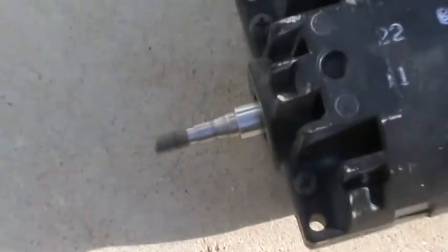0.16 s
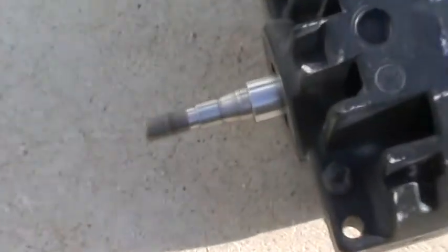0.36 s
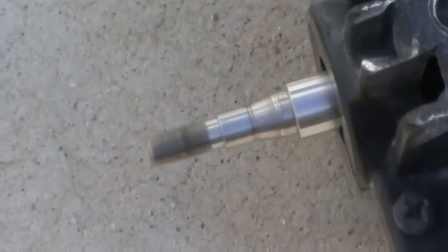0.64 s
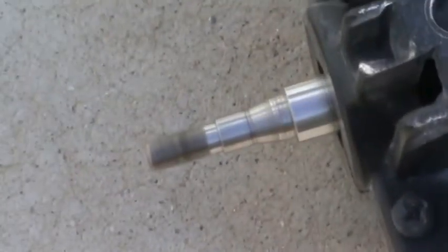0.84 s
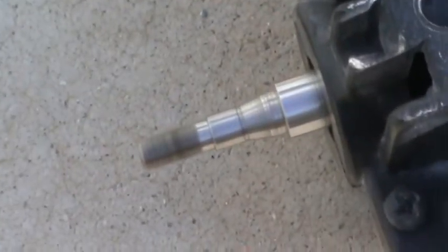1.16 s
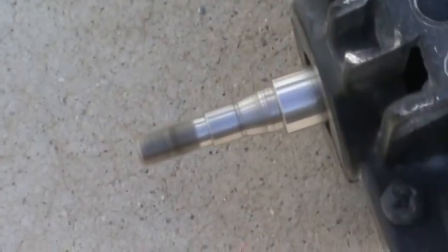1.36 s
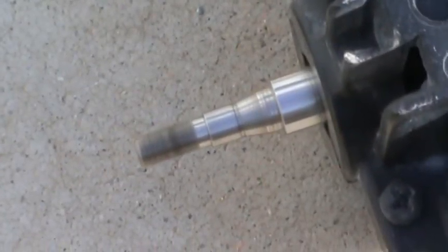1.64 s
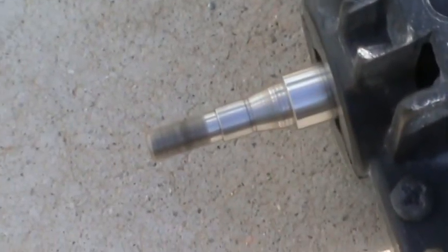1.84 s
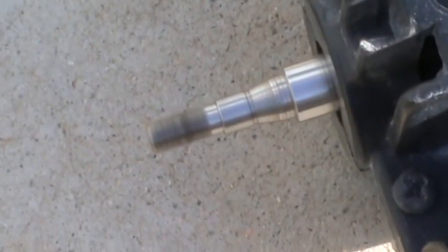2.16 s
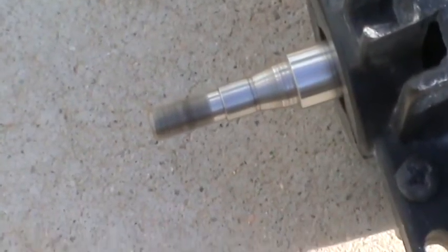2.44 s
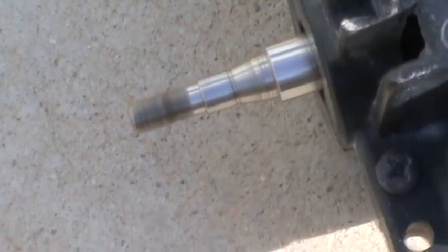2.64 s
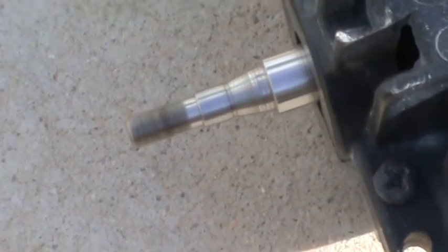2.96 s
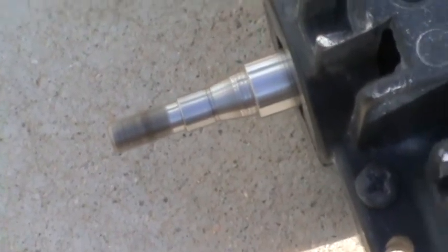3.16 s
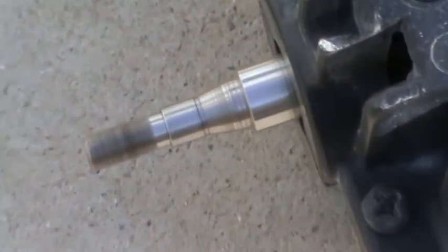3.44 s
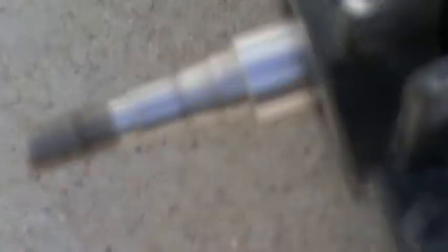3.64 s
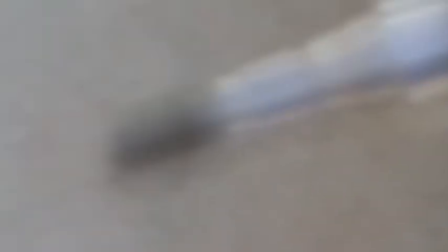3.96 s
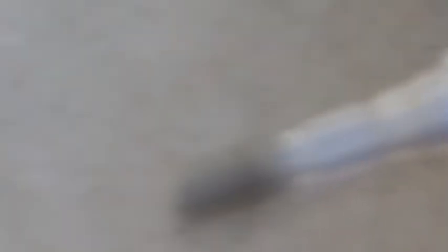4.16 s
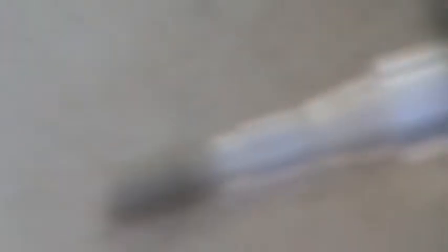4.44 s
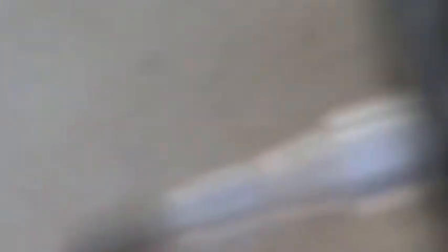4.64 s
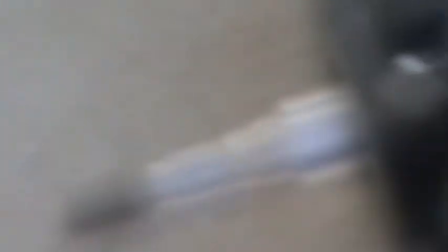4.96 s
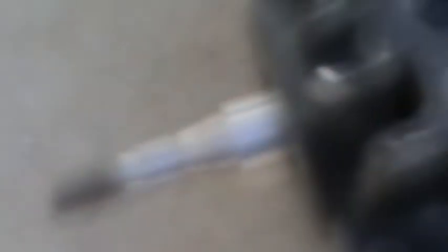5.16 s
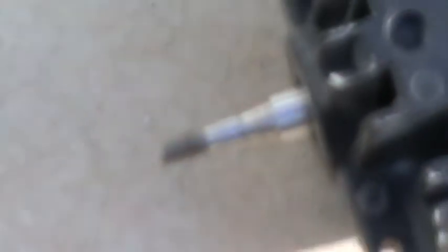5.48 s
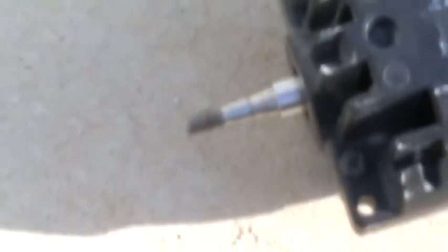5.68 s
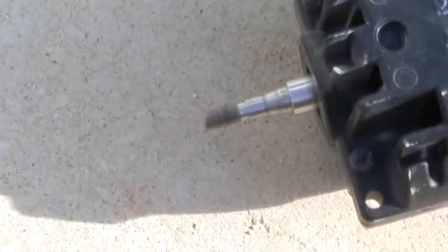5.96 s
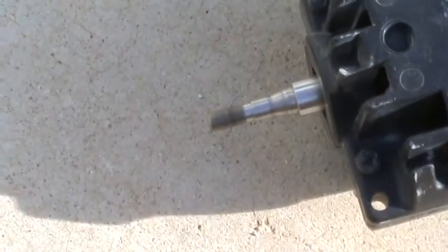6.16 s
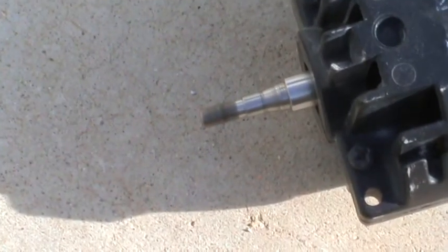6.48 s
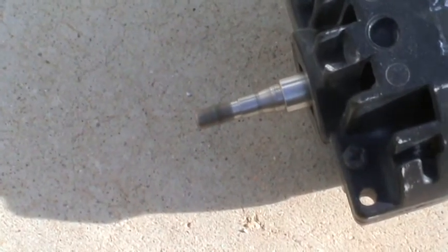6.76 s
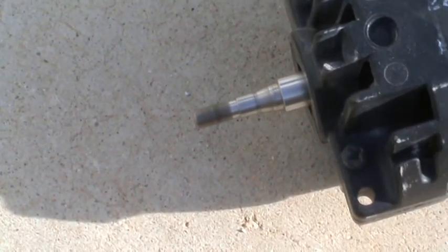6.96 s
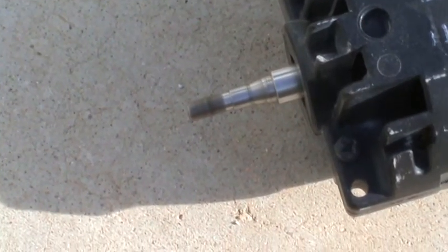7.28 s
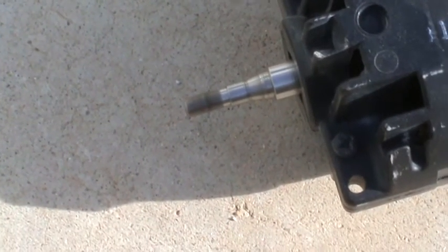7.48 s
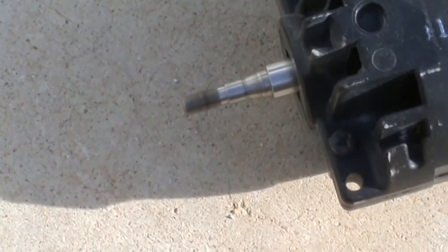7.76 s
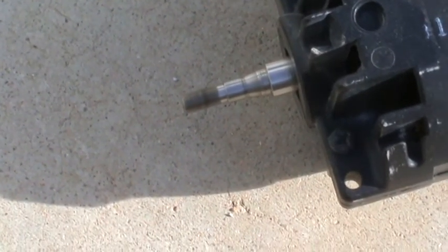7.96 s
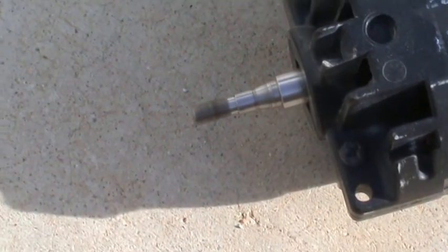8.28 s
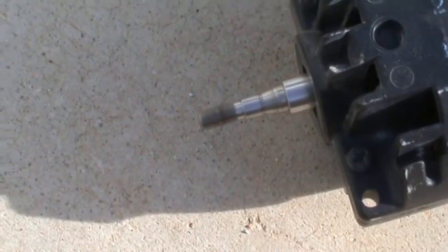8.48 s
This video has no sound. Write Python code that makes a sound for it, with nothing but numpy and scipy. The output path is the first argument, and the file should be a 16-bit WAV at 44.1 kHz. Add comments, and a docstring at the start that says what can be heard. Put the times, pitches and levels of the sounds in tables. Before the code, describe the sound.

A bare electric motor whines piercingly over a loud rush of air, climbing in pitch, holding, dropping back, then spinning down.

```python
"""A piercing electric whine over a rush of air climbs in pitch, holds, drops back and sinks away.
A bare brush motor runs on concrete outdoors, close to a hand-held camera: half-wave mains at first,
full power from about 1 s, half-wave again at 6.6 s, cut off at 7.5 s to coast. Commutator bars and rotor
slots sound as sines locked to the shaft angle, the rush as noise coloured by the housing; rotor tones,
a thin high hiss, low rumble, a sinking hum and soft bumps of the hand lie beneath."""
import sys
import numpy as np
from scipy import signal
from scipy.fft import rfft, irfft
from scipy.io import wavfile
from scipy.ndimage import uniform_filter1d, map_coordinates

SR = 44100
rng = np.random.default_rng(int(sys.argv[2]) if len(sys.argv) > 2 else 0)


def to_wav(s):
    """Save 16-bit WAV."""
    ch = np.atleast_2d(s).T  # columns
    pcm = np.round(np.clip(ch, -1, 1) * 32767)  # PCM
    wavfile.write(sys.argv[1], SR, pcm.astype(np.int16))


N = 380125

T = np.arange(N) / SR  # time [s]
HZ = np.fft.rfftfreq(N, 1 / SR)  # frequency of each spectrum bin [Hz]
MAINS_HZ = 60
BARS, SLOTS = 22, 24  # commutator bars and rotor slots, passing once each per turn
SWITCH_BLUR = 6000  # smoothing of the switch state [samples]

# the power switch; a negative aim stands for friction braking the shaft:
# (time [s], share of mains half-waves let through [0-1], speed aimed at before the wander [turns/s], lag [s])
SWITCH = [(0, .5, 269.2, .55), (1.031, 1, 319.86, .359), (6.564, .5, 270.4, .596), (7.531, 0, -73.6, 2.778)]


def amp(db):
    """Decibels to gain."""
    return 10 ** (np.asarray(db) / 20)


def curve(rows):
    """Each value column of a timed table, joined by straight lines at every sample."""
    times, *columns = np.transpose(rows)
    return [np.interp(T, times, column) for column in columns]


def read(points, hz):
    """A spectrum, joined by straight lines over log frequency."""
    point_hz, value = np.transpose(points)
    return np.interp(np.log(hz + 1), np.log(point_hz + 1), value)


def evened(x):
    """Scaled to rms 1."""
    return x / np.sqrt(np.mean(x ** 2) + 1e-20)


def drift(hz):
    """Smooth random motion of rms 1, up to about hz, refreshed every 50 samples."""
    knots = rng.standard_normal(4000)
    knot_positions = 2 * hz * T[::50]
    path = map_coordinates(knots, [knot_positions], order=3, mode="mirror")
    return evened(path.repeat(50)[:N])


def port(column):
    """One column of the table of the two microphone ports, at every frequency."""
    # (frequency [Hz], likeness of the ports [0-1], lead of the left [rad], left minus right [dB])
    port_table = [(45, 0.95, -0.08, 0.1), (130, 0.81, -0.52, -0.4), (250, 0.94, -1.17, -0.1),
                  (450, 0.92, -1.53, -0.6), (950, 0.98, -1.62, -1.0), (1600, 0.96, -1.44, -2.7),
                  (2500, 0.84, -1.09, -2.5), (3500, 0.92, -0.8, -3.4), (5000, 0.81, -0.42, -1.8),
                  (8000, 0.89, -0.12, -0.8), (9700, 0.87, -0.23, -0.5), (12000, 0.77, -3.01, 0.5),
                  (15000, 0.85, -0.01, 0.3)]
    return read(np.array(port_table)[:, [0, column]], HZ)


def ports(spectrum):
    """One sound at the two ports, with their differences in phase and level."""
    left = amp(port(3) / 2) * np.exp(.5j * port(2))
    return irfft(spectrum * np.array([left, 1 / left]), N)


def power():
    """The switch as three on/off tracks: half power, full power, off."""
    times, shares, _, _ = np.transpose(SWITCH)
    now = shares[np.searchsorted(times, T, side="right") - 1]
    return np.array([now == .5, now == 1, now == 0], float)


def shaft_speed():
    """Turns per second: the rotor's inertia makes it ease towards each new speed after the switch moves."""
    # a little irregularity, the last value held: (time [s], extra speed [turns/s])
    wander = [(0, -.35), (.85, .3), (1.2, 0), (1.97, 0), (3.5, 8.5), (4.35, 3.8), (4.7, 3.8), (5.25, 7.75),
              (5.55, 8), (6.15, 4.5), (6.56, 3.75)]
    speed = np.full(N, SWITCH[0][2])
    for start, _, aim, lag in SWITCH:
        after = T >= start
        speed[after] = aim + (speed[after][0] - aim) * np.exp(-(T[after] - start) / lag)
    return speed + curve(wander)[0]


def shaft(speed, half_wave_rad=0.18, full_wave_rad=.02, jitter_rad=.06):
    """Shaft angle [rad]: pulses of mains current nudge the rotor, once a cycle on half-wave, twice on full."""
    half, full, _ = power()
    mains = 2 * np.pi * MAINS_HZ * T
    nudge = half_wave_rad * half * np.sin(mains) + full_wave_rad * full * np.sin(2 * mains)
    # the depths are radians of the commutator whine, so divide by the bars
    return 2 * np.pi * np.cumsum(speed) / SR + (nudge + jitter_rad * drift(38)) / BARS


def whine(speed, angle, trim_db=0.0, slot_db=-3.5, slot_coast_db=3,
          flutter_db=0.74, sway_db=.5, slot_sway_db=2.0, lead_rad=-.55):
    """Passing bars give a piercing line, rotor slots a softer one above; the body favours some pitches."""
    # how strongly the body radiates, before trims: (pitch [Hz], commutator [dB], rotor slots [dB])
    radiation = [(3720, -37, -40), (3960, -29.5, -39), (4250, -34, -41), (4600, -42, -48), (5000, -40, -40),
                 (5580, -28, -36), (6085, -18, -33), (6460, -18, -32.5), (6960, -20, -36),
                 (7740, -21.5, -32), (7770, -20, -39)]
    # the camera moves through the beams of the whine: (time [s], level [dB], left minus right [dB])
    beam = [(0, 2.5, -2.5), (.9, 1.5, -2.5), (1.2, -0.5, -2.6), (1.65, -0.5, -2.4), (1.78, -1, -3),
            (2.1, 2.5, -.6), (2.42, -0.5, -.4), (2.62, -2, -5), (3.05, -1.5, -2.2), (3.25, -3.5, -4.8),
            (3.6, -3, -6), (3.8, -7.5, -6), (3.9, -0.9, -1.5), (4.4, -0.3, -3), (5.25, 0.5, -.6),
            (5.5, 0, 1.6), (6, 0.2, -1.9), (7.5, 0.2, -2)]
    hz, bars_db, slots_db = np.transpose(radiation)
    beam_db, pan_db = curve(beam)
    side = np.array([[.5], [-.5]])  # left, right
    bars = amp(np.interp(BARS * speed, hz, bars_db) + trim_db + sway_db * drift(5))

    # the slot line gains once the current is off
    coast_db = slot_coast_db * uniform_filter1d(power()[2], size=SWITCH_BLUR)
    slots = amp(np.interp(SLOTS * speed, hz, slots_db) + slot_db + coast_db + slot_sway_db * drift(5))

    bar_line = bars * np.sin(BARS * angle + side * lead_rad)
    slot_line = slots * np.sin(SLOTS * angle + side * lead_rad)
    # both waver a little together in the moving air
    level = amp(beam_db + side * pan_db + flutter_db * drift(28))
    return np.sqrt(2) * level * (bar_line + slot_line)


def housing():
    """Gain per root Hz of the air path out of the motor, of unit power from 700 to 3400 Hz."""
    # broad colour of the rush, before scaling: (frequency [Hz], level [dB per Hz])
    air_colour = [(30, -24.5), (130, -30), (430, -21.5), (750, -11), (1500, -3), (2600, -2.5), (3600, -0.5),
                  (5000, -3.5), (6500, -1.5), (9400, -6), (10800, -15.5), (12500, -16.5), (14300, -25.5),
                  (15600, -17)]
    # peaks in the colour of the rush; the narrow one near 535 Hz stands in for the twice-a-turn tone:
    # (frequency [Hz], width [Hz], rise [dB])
    colour_peaks = [(254, 120, 6), (535, 25, 5), (804, 202, 8.5), (1053, 87, 6), (1249, 88, 9.0),
                    (1474, 250, 8.5), (1670, 177, 4.5), (1930, 116, 3), (2105, 150, 5), (3245, 590, 3.5),
                    (4036, 245, 3.5), (6100, 770, 2)]
    peaks_db = sum(db / (1 + (2 * (HZ - hz) / width) ** 2) for hz, width, db in colour_peaks)
    gain = amp(read(air_colour, HZ) + peaks_db)
    middle = (HZ > 700) & (HZ < 3400)
    return gain / np.sqrt(np.sum(gain[middle] ** 2) * SR / N)


def rush_db(speed, start_db=-27, growth_db=11.6):
    """Level of the air before trims: it grows by growth_db a doubling of the starting speed."""
    # the camera moves in and out of the draught from the vents: (time [s], level [dB])
    draught = [(0, 2), (.9, 2.5), (1.2, -.3), (1.55, -0.1), (2.25, -1.5), (2.5, -0.4), (3.75, 0.03),
               (5, -1.06), (5.6, -.5), (6.9, -0.96), (7.55, .3)]
    return start_db + growth_db * np.log2(speed / speed[0]) + curve(draught)[0]


def rush(speed, angle, colour, trim_db=2.0, gust_db=0.47, chop=0.1, dull_db=5, dull_hz=800):
    """Turbulence round the rotor: noise lightly chopped twice a turn, coloured by the housing."""
    swirl = amp(gust_db * drift(20)) * (1 + chop * np.cos(2 * angle))
    shared, apart = rfft(rng.standard_normal((2, N)) * swirl)
    # the likeness of the ports sets how much noise they share
    likeness = port(1)
    opposed = np.array([[1], [-1]]) * np.sqrt((1 - likeness) / 2) * apart
    pair = np.sqrt((1 + likeness) / 2) * shared + opposed
    air = ports(pair * colour) * np.sqrt(SR / 2)

    # slower air makes larger eddies: the lows gain dull_db for each halving of the speed
    lows = signal.sosfiltfilt(signal.butter(2, dull_hz, fs=SR, output="sos"), air)
    low_gain = amp(dull_db * np.log2(speed.max() / speed))
    air = air + lows * (low_gain - 1)
    return air * amp(rush_db(speed) + trim_db)


def rotor_tones(speed, angle, colour, even_db=15, top_order=48, fade_db=2.5, jitter_rad=0.52,
                labour_db=4, labour_lag=14, trim_db=1, stand_out_db=8):
    """Weaker multiples of the shaft speed slide through the colour of the rush and fade in and out."""
    # prominent tones, levels before trims:
    # (multiple of the shaft speed, level over 1 Hz of the rush [dB], gain at full power [dB])
    orders = [(1, 12, -5), (2, 21, -2), (4, 14, 3), (6, 15, 5), (10, 9, 9), (12, 11, 8), (20, 16, -1),
              (26, 15, 3), (38, 18, -2), (44, 20, 2), (48, 22, -2)]
    # tones that the magnetic pull drives: (multiples of the shaft speed)
    pulled = (10, 12)
    full = uniform_filter1d(power()[1], size=SWITCH_BLUR)
    # pulled tones sing out at full power below top speed, fully so once labour_lag [turns/s] short of it
    labour = full * np.clip((speed.max() - speed) / labour_lag, 0, 1)

    # all other even multiples share one level
    named = [row[0] for row in orders] + [BARS, SLOTS]
    plain = [(order, even_db, 0) for order in range(2, top_order + 1, 2) if order not in named]
    tones = np.zeros(N)
    for order, db, full_db in orders + plain:
        pull_db = labour_db * labour * (order in pulled)
        level_db = db + full_db * full + pull_db + fade_db * drift(3)
        phase = order * angle + jitter_rad * drift(8) + 2 * np.pi * rng.random()
        colour_gain = np.interp(order * speed, HZ, colour)
        tones += np.sqrt(2) * colour_gain * amp(level_db) * np.sin(phase)

    # coasting, the rush dies faster than the tones: they stand out more with each halving of the speed
    halvings = np.maximum(np.log2(speed[0] / speed), 0)
    return ports(rfft(tones)) * amp(rush_db(speed) + trim_db + stand_out_db * halvings)


def high_hiss(angle, hiss_db=-53, low_hz=13500, chop=.4):
    """A thin, steady high hiss: high-passed noise, lightly chopped once a turn."""
    hiss = rng.standard_normal(N) * (1 + chop * np.sin(angle))
    high_pass = signal.butter(8, low_hz, "high", fs=SR, output="sos")
    return amp(hiss_db) * evened(signal.sosfilt(high_pass, hiss))


def rumble():
    """Low outdoor rumble: shaped noise whose level rises and falls."""
    # colour before scaling: (frequency [Hz], level [dB per Hz])
    rumble_colour = [(15, -14), (35, -7), (60, -2), (110, -6), (200, -3), (400, -8.5), (700, -8),
                     (1200, -30)]
    # (time [s], level [dB])
    rumble_level = [(0, -53), (.3, -51), (.6, -58), (1, -53), (2, -59), (3, -64), (6.8, -70), (7.8, -60),
                    (8.62, -60)]
    noise = irfft(rfft(rng.standard_normal(N)) * amp(read(rumble_colour, HZ)), N)
    return amp(curve(rumble_level)[0]) * evened(noise)


def sinking_hum():
    """A faint low sine that sinks in pitch and fades."""
    # (time [s], pitch [Hz], level [dB])
    hum_path = [(0, 67, -66), (1, 61.8, -61), (2, 58, -65), (3, 56, -70), (5, 54.2, -72), (7, 53, -80)]
    hum_hz, hum_db = curve(hum_path)
    return np.sqrt(2) * amp(hum_db) * np.sin(2 * np.pi * np.cumsum(hum_hz) / SR)


def frame_hum(speed, angle, hum_db=-56, frame_hz=245, width_hz=34):
    """The rotor's unbalance drives a resonance of the frame, strongest as the coast sweeps through it."""
    gain = amp(hum_db) / (1 + (2 * (speed - frame_hz) / width_hz) ** 4)
    return ports(rfft(np.sqrt(2) * gain * np.sin(angle)))


def hand_bumps():
    """Soft bumps of the hand on the camera: short low cosines under bell-shaped envelopes."""
    # (time [s], pitch [Hz], peak level [dB], time from the peak to 1/e [s])
    bump_table = [(3.685, 110, -48, .004), (3.687, 58, -43, .01), (3.71, 40, -52, .02),
                  (3.845, 55, -54, .015)]
    bumps = np.zeros(N)
    for start, hz, db, length in bump_table:
        envelope = np.exp(-((T - start) / length) ** 2)
        bumps += amp(db) * envelope * np.cos(2 * np.pi * hz * (T - start))
    return bumps


def scene():
    """One shaft drives the whines, the rush, the rotor tones and the frame, and chops the hiss."""
    speed, colour = shaft_speed(), housing()
    angle = shaft(speed)
    motor = whine(speed, angle) + rush(speed, angle, colour)
    motor = motor + rotor_tones(speed, angle, colour) + frame_hum(speed, angle)
    background = ports(rfft(rumble() + sinking_hum() + hand_bumps()))
    return motor + high_hiss(angle) + background


def record(dry, low_cut_hz=38, edge_hz=15750):
    """The microphone's low cut and the recorder's upper band limit."""
    thin = signal.sosfilt(signal.butter(2, low_cut_hz, "high", fs=SR, output="sos"), dry)
    band_limit = signal.firwin(1023, edge_hz, window=("kaiser", 9), fs=SR)
    return signal.oaconvolve(thin, band_limit[None], "same")


dry = scene()
out = record(dry)
to_wav(out)
```